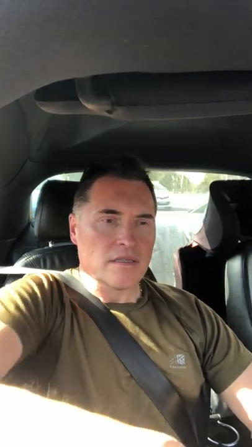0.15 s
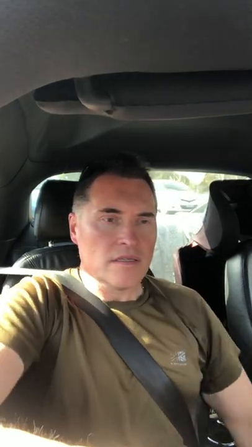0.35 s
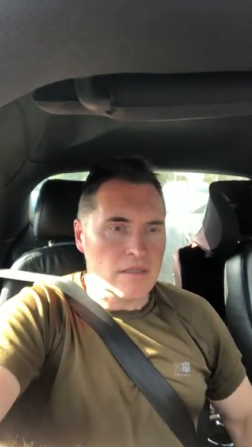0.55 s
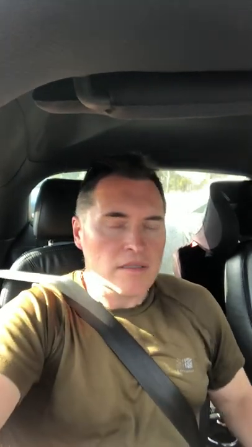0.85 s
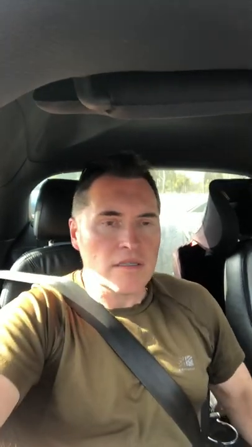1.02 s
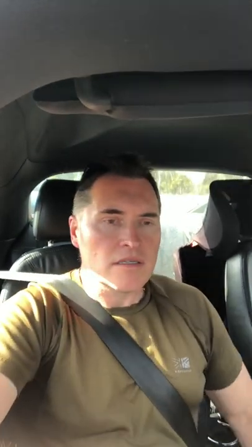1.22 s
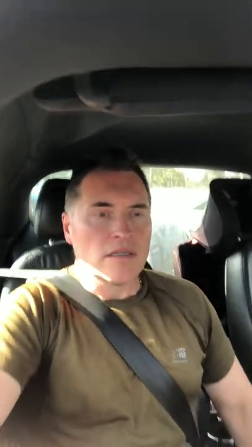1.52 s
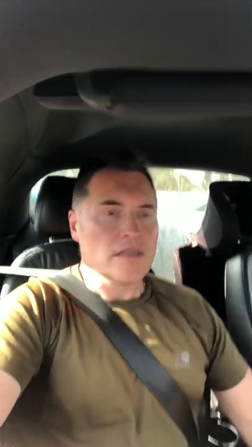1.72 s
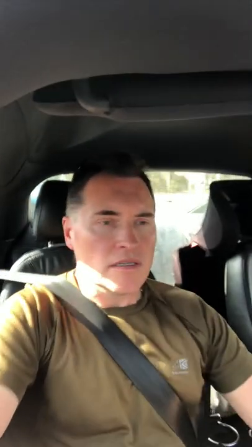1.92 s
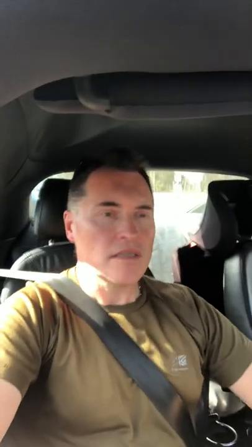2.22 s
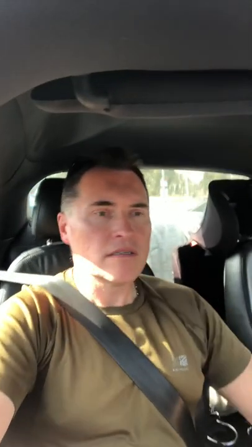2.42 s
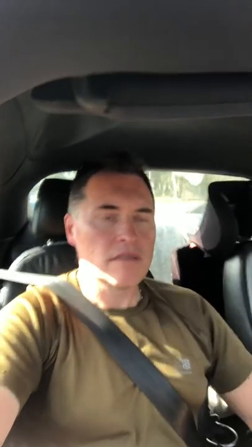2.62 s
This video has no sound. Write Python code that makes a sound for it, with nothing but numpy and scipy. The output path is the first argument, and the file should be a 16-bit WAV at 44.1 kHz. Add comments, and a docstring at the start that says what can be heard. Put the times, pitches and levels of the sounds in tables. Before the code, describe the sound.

Turbocharged petrol car engine heard inside the cabin, revs sagging then climbing as it pulls away

```python
"""Engine revs sag as the clutch bites, over road rumble, roar, intake hiss and a fan whirr in a closed cabin.
Then a turbocharged four-cylinder petrol car pulls away: the revs climb into a boom and ease off.
The engine is a stack of firing orders; running noise and whirr are coloured noise; the late whine is sines.
Trim near the driver knocks and chatters in dying sines, ticks and cloth are short noise,
latch clacks mix noise with ringing, and the bumps are low thuds."""
import sys
import numpy as np
from scipy import signal
from scipy.fft import rfft, irfft
from scipy.io import wavfile
from scipy.ndimage import uniform_filter1d, map_coordinates

SR = 44100
rng = np.random.default_rng(int(sys.argv[2]) if len(sys.argv) > 2 else 0)


def log_audio(samples):
    """Write samples as a 16-bit WAV file to the path given in sys.argv[1]."""
    # one column per channel
    frames = np.atleast_2d(samples).T
    # limit to full scale, then quantise
    limited = np.clip(frames, -1, 1)
    pcm = np.round(limited * 32767).astype(np.int16)
    wavfile.write(sys.argv[1], SR, pcm)


N = 121275


def amp(db):
    """Decibels to gain."""
    return 10 ** (np.asarray(db) / 20)


def unit(x):
    """Scales to rms 1."""
    return x / np.sqrt(np.mean(x ** 2) + 1e-20)


def curve(rows):
    """A (seconds, value) table, interpolated at every sample."""
    times, values = np.transpose(rows)
    return np.interp(np.arange(N) / SR, times, values)


def read_spectrum(points, hz):
    """A (Hz, dB) table, interpolated on a log-frequency axis."""
    table_hz, db = np.transpose(points)
    return np.interp(np.log(hz + 1), np.log(table_hz), db)


def add(mix, start_s, sound):
    """Mixes a sound in, cutting it where the scene ends."""
    part = mix[round(start_s * SR):][:len(sound)]
    part += sound[:len(part)]


def noise(shape, size=N):
    """Noise of rms 1 whose spectrum follows shape(Hz) in dB."""
    spectrum = rfft(rng.standard_normal(size))
    gain = amp(shape(np.fft.rfftfreq(size, 1 / SR)))
    return unit(irfft(spectrum * gain, size))


def drift(rate_hz):
    """Random wander of rms 1: straight lines between random points, two points per cycle of the rate."""
    points = rng.standard_normal(400)
    place = np.arange(N) / SR * 2 * rate_hz
    return unit(map_coordinates(points, [place], order=1, mode="wrap"))


def strike_time():
    """Seconds since a short sound began, for a quarter of a second."""
    return np.arange(SR // 4) / SR


def ring(modes, t):
    """A struck object's modes: sines that each die away exponentially."""
    out = 0
    for hz, db, t60 in modes:
        out = out + amp(db) * np.exp(-np.log(1000) * t / t60) * np.sin(2 * np.pi * hz * t)
    return out


# Engine speed. Each row: time in seconds, firings per second.
ENGINE_SPEED = [(0.0, 72.5), (0.05, 69.1), (0.21, 56.2), (0.34, 46.2), (0.47, 41.1), (0.61, 50.6),
                (0.68, 53.9), (0.83, 55.8), (0.91, 58.6), (1.13, 78.5), (1.25, 87.6), (1.37, 95.8),
                (1.46, 97.7), (1.52, 98.2), (1.68, 93.8), (1.75, 96.6), (1.84, 105.7), (2.07, 118.3),
                (2.21, 123.3), (2.37, 118.9), (2.5, 118.3), (2.63, 113.8), (2.75, 110.8)]


def engine_speed():
    """The firing rate, smoothed over 50 ms because the revs cannot jump."""
    return uniform_filter1d(curve(ENGINE_SPEED), size=2200)


# Boom at the firing rate. Each row: time in seconds, level in dB.
FIRING_TONE_LEVEL = [(0,-52),(.05,-36.5),(.13,-20),(.23,-17),(.33,-24.5),(.48,-25.5),(.68,-20.5),(.95,-20.5),(1.04,-24.5),(1.11,-39),(1.25,-24),(1.38,-15.5),(1.52,-15),(1.63,-12),(1.75,-14),(1.83,-20.5),(1.93,-13),(2.12,-8),(2.36,-9),(2.51,-15.5),(2.59,-14),(2.75,-22.5)]
# Boom an octave above the firing rate. Each row: time in seconds, level in dB.
OCTAVE_LEVEL = [(0,-39),(.05,-20),(.16,-17.5),(.27,-32),(.35,-19),(.48,-30),(.59,-21),(.68,-30.5),(.94,-17.5),(1.13,-22.5),(1.23,-13),(1.31,-26.5),(1.37,-14),(1.48,-23),(1.66,-12.5),(1.75,-13),(1.83,-35),(2.22,-29.5),(2.5,-40),(2.75,-56)]
# Engine load, which lifts and drops the overtones. Each row: time in seconds, gain in dB.
ENGINE_LOAD = [(0,-5),(.22,-3.5),(.36,-3.5),(.47,0.5),(.62,-4.5),(.85,-2),(1.08,-1.5),(1.3,3.5),(1.5,1),(1.68,6.5),(1.85,3.5),(2.0,6),(2.2,1.5),(2.45,-7),(2.75,-7.5)]
# How the cabin carries an overtone. Each row: frequency in Hz, gain in dB.
CABIN_RESPONSE = [(120,-9.5),(143,-31),(162,-16),(180,-19),(215,-28.5),(245,-30),(280,-28.5),(320,-38.5),(370,-39.5),(425,-31.5),(490,-45),(540,-50),(590,-40.5),(720,-49),(1100,-60),(1800,-63.5)]
ORDER_DB_PER_OCTAVE = -8  # fall of the overtones above order 3
HALF_ORDER_DB, HALF_FULL_HZ = -16.5, 100  # the cylinders differ more as revs rise to this firing rate
TONE_WAVER, OVERTONE_WAVER = 0.07, 0.43  # depth of random waver
WAVER_HZ, WAVER_FULL_HZ = 13, 400  # overtone waver reaches its depth at 400 Hz and doubles by 800 Hz
SMEAR_HZ = 160.9  # below this the orders arrive together as one thump per firing


def engine(firing_hz, turns, count=12):
    """Firing thumps: two booming low orders, cabin-coloured overtones, half orders from unequal cylinders."""
    def order(k, waver):
        wobble = 1 + waver * (drift(WAVER_HZ) + 1j * drift(WAVER_HZ))
        lag = np.minimum(k * firing_hz / SMEAR_HZ, 2) ** 3
        if k > 5:
            lag = lag + k * rng.random()  # scatters the high orders
        return np.sqrt(2) * np.real(wobble * np.exp(1j * (2 * np.pi * k * turns - lag)))

    def overtone(k):
        hz = k * firing_hz
        level_db = read_spectrum(CABIN_RESPONSE, hz) + ORDER_DB_PER_OCTAVE * np.log2(k / 3)
        return amp(level_db) * order(k, OVERTONE_WAVER * np.minimum(hz / WAVER_FULL_HZ, 2))

    boom = amp(curve(FIRING_TONE_LEVEL)) * order(1, TONE_WAVER)
    boom += amp(curve(OCTAVE_LEVEL)) * order(2, TONE_WAVER)
    whole = sum(overtone(k + 1) for k in range(2, count))
    half = sum(rng.choice([-1, 1]) * overtone(k + .5) for k in range(2, count))
    unevenness = amp(HALF_ORDER_DB) * np.minimum(firing_hz / HALF_FULL_HZ, 1)
    return boom + amp(curve(ENGINE_LOAD)) * (whole + unevenness * half)


PATCHY_DB, RIPPLE_DB = -0.5, 3.5  # rms depth of drifting patches, and of the fixed ripple above 1500 Hz


def wash(colour):
    """Coloured noise with a fixed ripple from cabin reflections and drifting patches."""
    hz, _, z = signal.stft(noise(lambda f: read_spectrum(colour, f)), SR, nperseg=1024)
    patches = uniform_filter1d(rng.standard_normal(z.shape), size=9, axis=0)
    patches = unit(uniform_filter1d(patches, size=5, axis=1))
    ripple = rng.standard_normal((len(hz), 1)) * (hz[:, None] > 1500)
    shaped = z * amp(PATCHY_DB * patches + RIPPLE_DB * ripple)
    return unit(signal.istft(shaped, nperseg=1024)[1][:N])


# Colour of the road and body rumble. Each row: frequency in Hz, relative density in dB per Hz.
RUMBLE_COLOUR = [(20,-40.5),(33,-7.5),(50,8),(70,11.5),(110,9),(170,13),(240,8.5),(330,-2.5),(480,-24),(800,-61.5)]
# Rumble fader. Each row: time in seconds, level in dB.
RUMBLE_LEVEL = [(0,-23),(.5,-26),(1.0,-24.5),(1.3,-23.5),(1.7,-27.5),(1.87,-24.5),(2.05,-28.5),(2.2,-27.5),(2.42,-30.5),(2.58,-26),(2.75,-28.5)]
# Colour of the mechanical roar. Each row: frequency in Hz, relative density in dB per Hz.
ROAR_COLOUR = [(150,-23),(330,6),(450,3),(600,-3),(850,-6.5),(1100,-11.5),(1400,-16.5),(2000,-28),(3500,-60.5)]
# Roar fader. Each row: time in seconds, level in dB before flicker.
ROAR_LEVEL = [(0,-39.5),(.4,-37.5),(.75,-39.5),(1.1,-37.5),(1.5,-33.5),(1.8,-36),(2.1,-33),(2.35,-31.5),(2.55,-33),(2.75,-37.5)]
# Colour of the intake hiss. Each row: frequency in Hz, relative density in dB per Hz.
HISS_COLOUR = [(800,-3),(1700,4),(2600,3),(3500,-2),(4300,-5),(5300,-2.5),(6500,-7.5),(8500,-13.5),(12000,-19.5),(15500,-21.5)]
# Hiss fader. Each row: time in seconds, level in dB.
HISS_LEVEL = [(0,-55),(.2,-58.5),(.42,-54.5),(.65,-60),(.88,-60),(1.1,-56.5),(1.35,-55),(1.62,-50),(1.85,-54.5),(2.2,-54.5),(2.35,-50.5),(2.5,-59),(2.62,-55),(2.75,-62)]
FIRING_DEPTH = 0.13  # throb of roar and hiss at each firing
ROAR_FLICKER_DB, FLICKER_HZ = 1.5, 47


def running_noise(turns):
    """Steady-textured road rumble, with a flickering roar and intake hiss that throb at each firing."""
    throb = unit(1 + FIRING_DEPTH * np.cos(2 * np.pi * turns))
    rumble = amp(curve(RUMBLE_LEVEL)) * wash(RUMBLE_COLOUR)
    roar = amp(curve(ROAR_LEVEL) + ROAR_FLICKER_DB * drift(FLICKER_HZ)) * wash(ROAR_COLOUR)
    hiss = amp(curve(HISS_LEVEL)) * wash(HISS_COLOUR)
    return rumble + throb * (roar + hiss)


# Whirr of the cabin fan. Each row: centre in Hz, width in Hz, level in dB.
FAN_BANDS = [(2058,35,-71),(2432,59,-66.5),(2743,23,-74),(3140,45,-76.5),(3324,47,-67),(3400,60,-67.5),(3710,45,-70.5),(4260,70,-76.5),(4950,310,-69)]


def fan_whirr():
    """The cabin fan whirrs steadily: narrow resonances rung by noise."""
    out = np.zeros(N)
    for hz, width, db in FAN_BANDS:
        out += amp(db) * noise(lambda f: -20 * np.log10(1 + (2 * (f - hz) / width) ** 2))
    return out


# Crackle of clothing and seat belt. Each row: start in seconds, end in seconds, lowest tick level in dB.
RUSTLES = [(0.215,0.438,-59.5),(0.984,1.11,-69.5)]
RUSTLE_PER_S, RUSTLE_HZ, RUSTLE_T60 = 46, 6660, 0.017
RUSTLE_SPREAD_DB = 3.5  # mean lift above the lowest level


def rustle():
    """Sparse tiny ticks of cloth as the driver moves, a few louder than the rest."""
    out = np.zeros(N)
    for start, end, lowest_db in RUSTLES:
        length = end - start
        for place, strength in rng.random((round(length * RUSTLE_PER_S), 2)):
            db = lowest_db - RUSTLE_SPREAD_DB * np.log(strength)
            add(out, start + place * length, tick(db, RUSTLE_HZ, RUSTLE_T60))
    return out


# Small ticks. Each row: start in seconds, level in dB, centre in Hz, 60 dB decay time in seconds.
TICKS = [(.276,-47,3880,0.046),(.371,-43,4040,0.068),(.411,-50,2930,.04),(.509,-50,2840,.05),(1.063,-45,5600,0.027),(1.072,-43.5,6200,0.01),(1.099,-49.5,5360,0.017),(1.438,-42.5,5800,0.077),(1.712,-48.5,3300,.025),(1.997,-45.5,3990,0.059)]
TICK_SKIRT_DB = 14.5  # drop one octave either side of the centre


def tick(db, centre_hz, t60):
    """A small bright contact, a noise burst that dies fast in the padded cabin."""
    t = strike_time()
    burst = noise(lambda f: -TICK_SKIRT_DB * np.log2((f + 1) / centre_hz) ** 2, size=len(t))
    return amp(db - 60 * t / t60) * burst


# Hollow knocks of the trim. Each row: start in seconds, level in dB, pitch in Hz.
KNOCKS = [(.279,-38,780),(.377,-23.5,743),(.411,-20,655),(.51,-33.5,776)]
# Modes of a knock. Each row: multiple of the pitch, level in dB, 60 dB decay time in seconds.
PANEL_MODES = [(1,0,.07),(1.27,-18,.04),(1.7,-20,.06)]


def knock(db, pitch_hz):
    """A dull blow on a hollow panel sets a few short modes ringing."""
    modes = [(ratio * pitch_hz, level, t60) for ratio, level, t60 in PANEL_MODES]
    return amp(db) * ring(modes, strike_time())


# Latch clacks. Each row: start in seconds, overall gain in dB, treble tilt in dB per octave,
# ring of the housing in dB, rattling tail in dB, pitch ratio of the housing.
CLACKS = [(.9262,-14.5,-0.5,-1.5,-12.5,1),(1.1262,-23,-0.8,-20,-11,1.6),(1.1785,-19,-2.03,-4,-7.5,1.04)]
# Colour of the snap before tilt. Each row: frequency in Hz, relative density in dB per Hz.
SNAP_COLOUR = [(150,-38),(320,15.5),(450,0),(650,-9),(850,4.5),(1100,5.5),(1500,-10),(2200,-8),(3000,-5.5),(3700,-2),(4400,-10.5),(5500,-14),(6600,-10),(8500,-22),(12000,-21),(15500,-26)]
# Housing modes at pitch ratio 1. Each row: frequency in Hz, level in dB, 60 dB decay time in seconds.
HOUSING_MODES = [(296,-12.5,0.24),(632,3.5,.08),(1140,-14.5,0.038),(1770,-17,0.026),(3040,-20,0.12),(3640,-23,.07),(3760,-6,0.023),(4750,-18.5,0.057),(7100,-18,0.042)]
CLACK_RISE_S, CLACK_HOLD_S, CLACK_T60, TAIL_T60 = 0.0019, 0.0048, 0.057, 0.12
REBOUND_S, REBOUND_DB, RATTLE_DB = 0.019, -27, 1.5


def clack(db, tilt_db, ring_db, tail_db, pitch):
    """A latch snaps over in a noise burst, rings its housing, rattles and rebounds once."""
    t = strike_time()
    burst = noise(lambda f: read_spectrum(SNAP_COLOUR, f) + tilt_db * np.log2(f + 20), size=len(t))
    rattle = amp(RATTLE_DB * unit(uniform_filter1d(rng.standard_normal(len(t)), size=50)))
    snap = amp(-60 * np.maximum(t - CLACK_HOLD_S, 0) / CLACK_T60)
    tail = amp(tail_db - 60 * t / TAIL_T60)
    rebound = (t > REBOUND_S) * amp(REBOUND_DB - 60 * np.maximum(t - REBOUND_S, 0) / CLACK_T60)
    contact = .5 * burst * rattle * (snap + tail + rebound)
    housing = amp(ring_db) * ring(HOUSING_MODES, t * pitch)  # a higher pitch also dies sooner
    return amp(db) * np.minimum(t / CLACK_RISE_S, 1) * (contact + housing)


CHATTER_START_S, CHATTER_END_S, CHATTER_PER_S = 1.1, 2.4, 18
CHATTER_LOWEST_DB, CHATTER_SPREAD_DB = -46.5, 0.5  # lowest knock, mean lift above it
CHATTER_LOW_HZ, CHATTER_HIGH_HZ = 570, 1298


def chatter():
    """Loose trim, shaken while the engine pulls, gives faint knocks at random times and pitches."""
    out, length = np.zeros(N), CHATTER_END_S - CHATTER_START_S
    for place, strength, pitch in rng.random((round(length * CHATTER_PER_S), 3)):
        hz = CHATTER_LOW_HZ + pitch * (CHATTER_HIGH_HZ - CHATTER_LOW_HZ)
        db = CHATTER_LOWEST_DB - CHATTER_SPREAD_DB * np.log(strength)
        add(out, CHATTER_START_S + place * length, knock(db, hz))
    return out


# Bumps in the road. Each row: start in seconds, level in dB.
BUMPS = [(1.175,-22.5),(1.83,-23),(2.14,-24.5),(2.54,-22)]
BUMP_HZ, BUMP_PEAK_S = 53.7, 0.029  # the swell peaks this long after the start


def bump(db):
    """A wheel drops over a seam and the body gives a soft, low thud."""
    t = strike_time()
    swell = t / BUMP_PEAK_S * np.exp(1 - t / BUMP_PEAK_S)
    return amp(db) * swell * np.sin(2 * np.pi * BUMP_HZ * t)


# Partials of the thin whine. Each row: mean frequency in Hz, relative level in dB.
WHINE_PARTIALS = [(3460,1.5),(2560,-7)]
# Whine fader. Each row: time in seconds, gain in dB before flutter.
WHINE_LEVEL = [(2.15,-76.5),(2.3,-54.5),(2.42,-54),(2.55,-58.5),(2.62,-58.5),(2.75,-68)]
WHINE_WAVER_HZ, WHINE_FLUTTER_DB = 45, 4.5  # rms wander of pitch and level


def whine():
    """A thin whine swells late on: sines whose pitch and level flutter at random."""
    tone = np.zeros(N)
    for hz, db in WHINE_PARTIALS:
        wavering_hz = hz + WHINE_WAVER_HZ * drift(FLICKER_HZ)
        tone += amp(db) * np.sin(2 * np.pi * np.cumsum(wavering_hz) / SR)
    return tone * amp(curve(WHINE_LEVEL) + WHINE_FLUTTER_DB * drift(WAVER_HZ))


def scene():
    """Engine, running noise, fan, whine and fittings summed to one channel."""
    firing_hz = engine_speed()
    turns = np.cumsum(firing_hz) / SR  # firings so far
    mix = engine(firing_hz, turns) + running_noise(turns) + fan_whirr() + whine()
    for table, source in (TICKS, tick), (KNOCKS, knock), (CLACKS, clack), (BUMPS, bump):
        for start_s, *settings in table:
            add(mix, start_s, source(*settings))
    return (mix + rustle() + chatter())[None]


EDGE_HZ = 15850


def record(dry):
    """The recorder's band limit: a steep low-pass takes off the extreme treble."""
    lowpass = signal.firwin(511, EDGE_HZ, window=("kaiser", 9), fs=SR)
    return signal.oaconvolve(dry, lowpass[None], "same")


dry = scene()
out = record(dry)
log_audio(out)
```